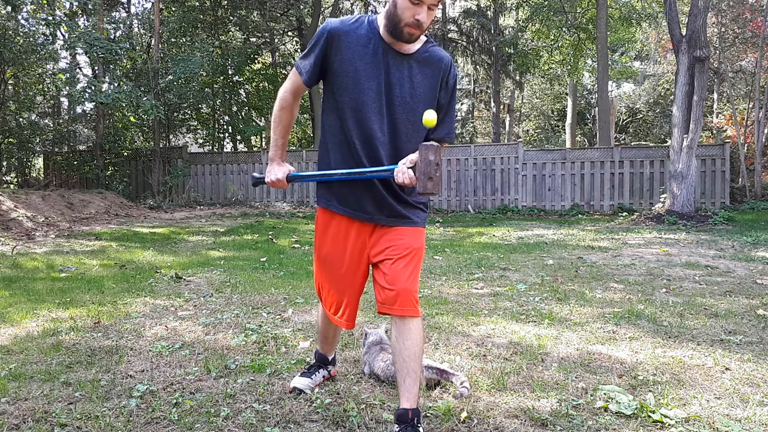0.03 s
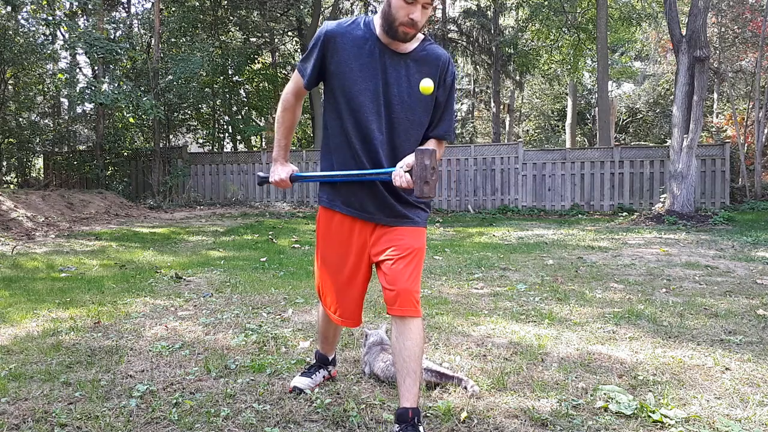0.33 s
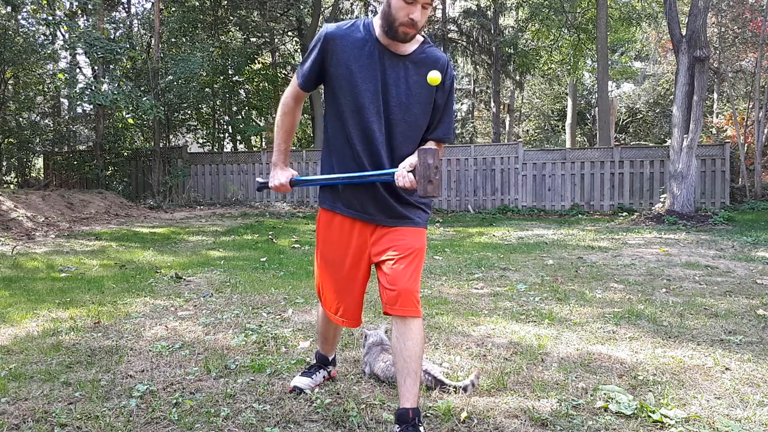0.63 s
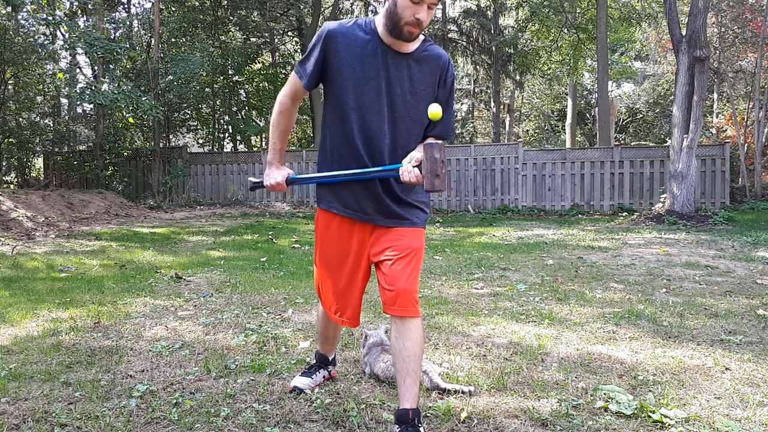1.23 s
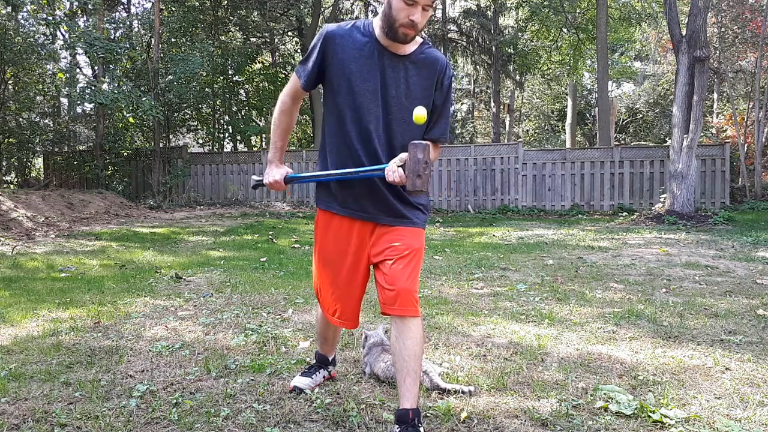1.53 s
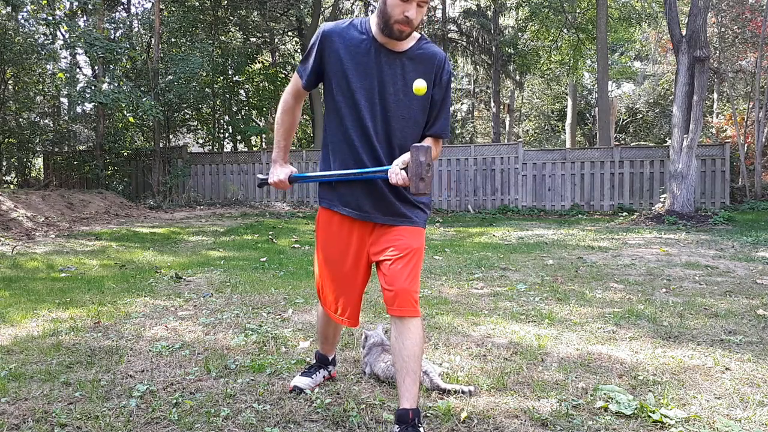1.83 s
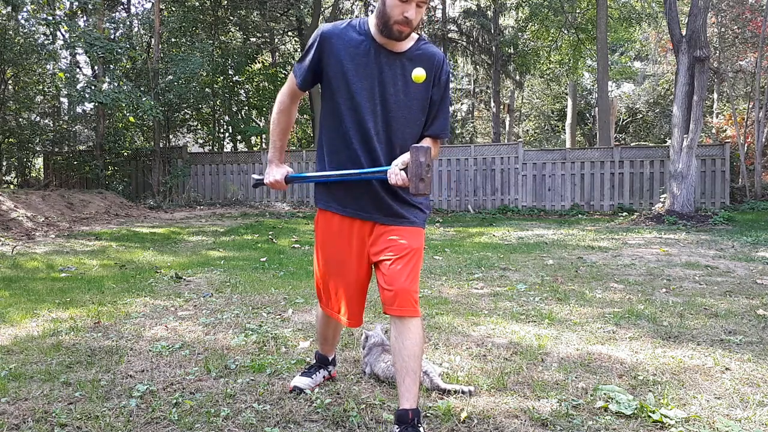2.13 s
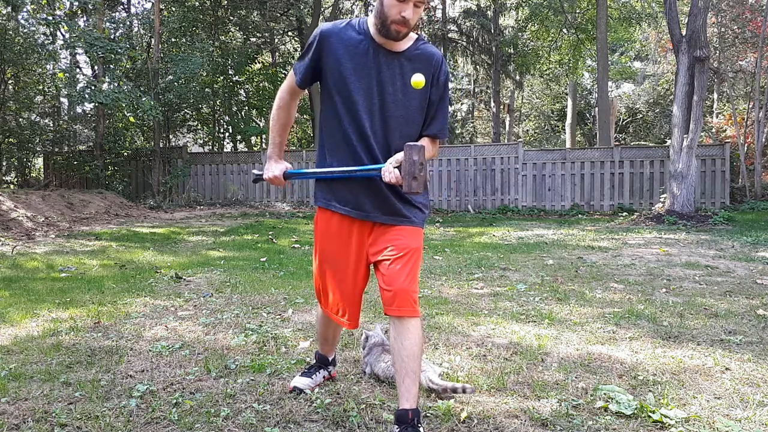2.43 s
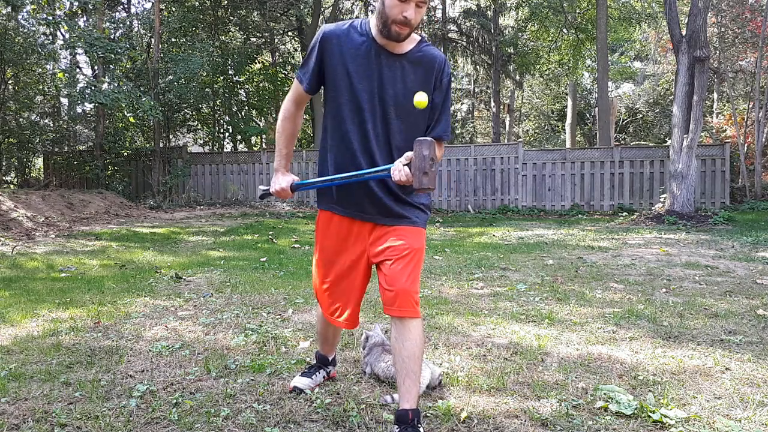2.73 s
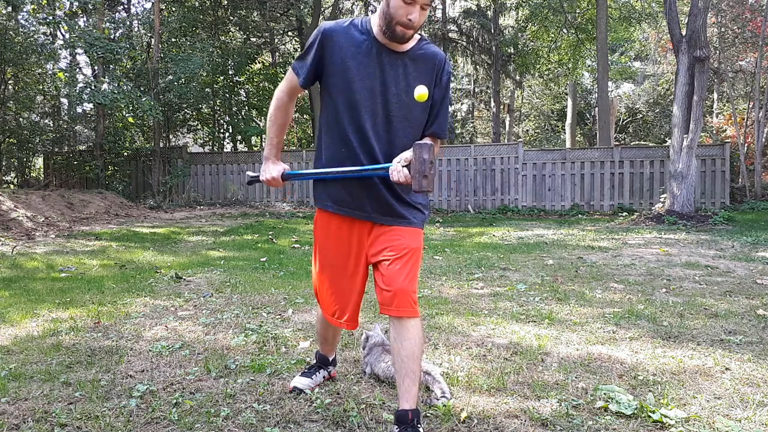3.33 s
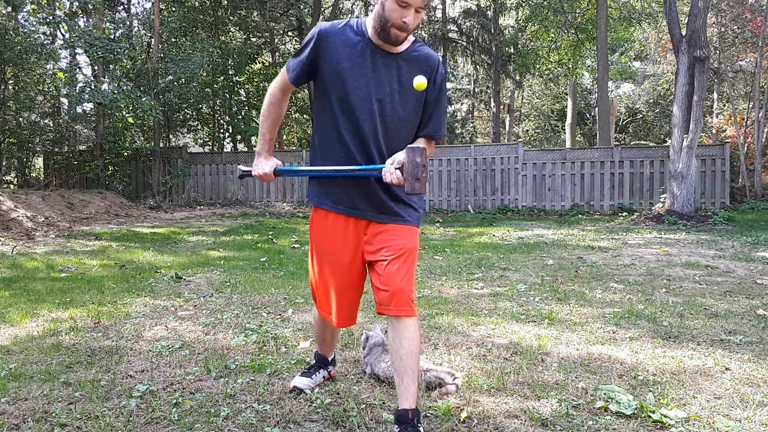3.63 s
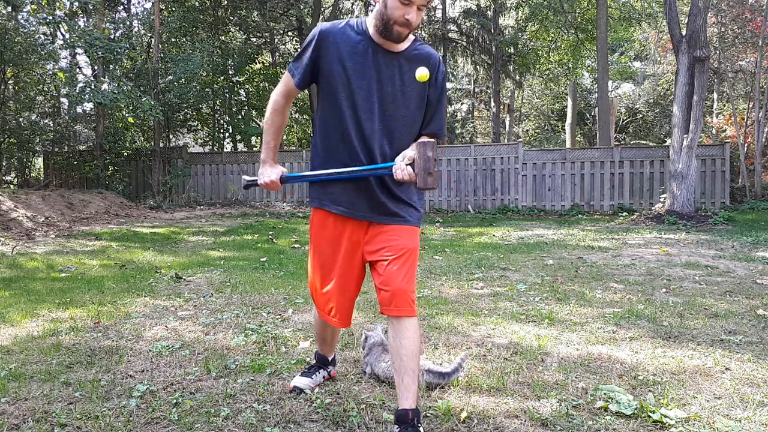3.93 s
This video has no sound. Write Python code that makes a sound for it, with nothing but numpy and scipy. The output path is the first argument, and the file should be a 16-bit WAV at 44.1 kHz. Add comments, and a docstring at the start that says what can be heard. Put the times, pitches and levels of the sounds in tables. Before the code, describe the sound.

Sharp, even taps of a ball bouncing on a sledgehammer, over faint crickets and distant traffic.

```python
"""A backyard, where a small ball is kept bouncing on the steel head of a sledgehammer.
Each tap is a hollow knock with a very short metallic ring, mirrored by the ground and scattered by
fence and trees. Crickets chirp and a katydid ticks and buzzes with its wings. Two faint bird notes
come through the trees, and engines drone far away over the hush of traffic and leaves."""
import sys
import numpy as np
from scipy import signal
from scipy.io import wavfile

SR = 44100
rng = np.random.default_rng(int(sys.argv[2]) if len(sys.argv) > 2 else 0)


def transcribe(signal):
    """Save signal, clipped to [-1, 1], as a 16-bit WAV file at the path in sys.argv[1]."""
    frames = np.atleast_2d(signal).T
    limited = np.clip(frames, -1, 1)
    pcm = np.round(limited * 32767).astype(np.int16)
    wavfile.write(sys.argv[1], SR, pcm)


N = 176400
T = np.arange(N) / SR


def from_db(db):
    """Decibels to gain."""
    return 10 ** (np.asarray(db) / 20)


def rms_one(x):
    """Scale to rms 1."""
    return x / np.sqrt(np.mean(x ** 2) + 1e-20)


def automation(rows):
    """Breakpoint curves, read at every sample."""
    time_s, *columns = np.transpose(rows)
    return [np.interp(T, time_s, column) for column in columns]


def at_hz(points, hz):
    """Read a curve on a log-frequency axis."""
    freq_hz, value = np.transpose(points)
    return np.interp(np.log(hz), np.log(freq_hz), value)


def pan(db):
    """Left and right gains; positive is to the right."""
    return from_db(np.array([[-db], [db]]))


def butter(x, hz, kind, order=2):
    """Butterworth low-, high- or band-pass."""
    sos = signal.butter(order, np.clip(hz, 10, .48 * SR), kind, fs=SR, output="sos")
    return signal.sosfilt(sos, x + 1e-18)


def drift(hz):
    """Random modulation slower than hz, at rms 1."""
    return rms_one(butter(rng.standard_normal(N + SR), hz, "low")[SR:])


def clicks(times_s, db):
    """One click at each time."""
    out = np.zeros(N)
    out[np.clip(np.round(times_s * SR).astype(int), 0, N - 1)] = from_db(db)
    return out


def ring(x, hz, t60_s):
    """A resonator: a unit click sets a sine of height 1 ringing."""
    r, w = np.exp(-np.log(1000) / (t60_s * SR)), 2 * np.pi * hz / SR
    return signal.lfilter([0, np.sin(w)], [1, -2 * r * np.cos(w), r * r], x + 1e-18)


def yard(x, t60_s=0.28, build_s=0.0064):
    """Reverb of fence and trees: dense faint echoes, different at each ear."""
    t = T[:SR // 2]
    onset = 1 - np.exp(-(t / build_s) ** 2)
    echoes = rng.standard_normal((2, len(t))) * np.exp(-np.log(1000) * t / t60_s) * onset
    return signal.fftconvolve(x[None], rms_one(echoes) / np.sqrt(len(t)), axes=1)[:, :N]


# Stereo image of the noise, centred lows and wide highs: freq_hz, left_right_correlation
STEREO_IMAGE = [(60, 1), (150, 0.92), (280, 0.83), (550, 0.75), (1000, -0.24), (2000, -0.13),
                (4000, -0.048), (12000, -0.07)]


def noise_bands(spectrum, low_hz, high_hz, count):
    """Centres and bands of shaped stereo noise; the bands add up to rms 1."""
    edges = np.geomspace(low_hz, high_hz, count + 1)
    centres = np.sqrt(edges[1:] * edges[:-1])
    white, bands = rng.standard_normal((2, 2, N)), []
    for k, hz in enumerate(centres):
        mid, side = butter(white[k % 2], edges[k:k + 2], "band", order=3)
        alike = np.clip(at_hz(STEREO_IMAGE, hz), -1, 1)
        stereo = np.sqrt(1 + alike) * mid + np.sqrt(1 - alike) * side * [[1], [-1]]
        bands.append(from_db(at_hz(spectrum, hz)) * stereo)
    return centres, np.array(bands) / np.std(sum(bands))


# Tone of the bed of traffic and leaves: freq_hz, relative_density_db
HUSH_SPECTRUM = [(25, -49), (40, -15.5), (60, -8), (105, 3.5), (170, -3), (260, -12.5), (420, -21.5),
                 (620, -22), (950, -11), (1300, -18.5), (2000, -28), (3500, -33.5), (6000, -38.5),
                 (10000, -42), (16000, -38)]
# Fader ride on the rumble: time_s, gain_db
RUMBLE_RIDE = [(0, -56.5), (.9, -56.5), (1.8, -52), (3.1, -51), (4, -54.5)]
TRAFFIC_PAN_DB = 1.05


def hush(crossover_hz=450, wash_gain_db=-55.5):
    """Traffic rumble that swells slowly, under a steady wash of tyres and leaves."""
    centres, bands = noise_bands(HUSH_SPECTRUM, 22, 17500, count=26)
    rumble_db, = automation(RUMBLE_RIDE)
    low = centres < crossover_hz
    rumble = pan(TRAFFIC_PAN_DB) * from_db(rumble_db) * bands[low].sum(0)
    return rumble + from_db(wash_gain_db) * bands[~low].sum(0)


# Two far engines, one revving up and easing off, one steadier: time_s, firing_hz, level_db
REVVING_ENGINE = [(0, 80, -60), (.5, 90, -55.5), (.88, 90, -49), (1.05, 102, -55), (1.3, 113, -51),
                  (1.6, 128, -53), (2.0, 133, -49.5), (2.4, 135, -61.5), (2.6, 150, -58.5), (3.1, 150, -58),
                  (3.4, 130, -68.5), (4, 127, -66)]
CRUISING_ENGINE = [(0, 94.8, -76), (1.2, 91.35, -58.5), (1.85, 101.9, -59), (2.15, 112, -50),
                   (2.42, 103.1, -48), (2.75, 106.4, -54.5), (3.3, 110, -54), (4, 110, -54)]


def engine(curve, flutter=0.28, octave_db=-18.5):
    """Only the firing note and its octave carry this far, fluttering on the way."""
    hz, db = automation(curve)
    phase = 2 * np.pi * np.cumsum(hz) / SR
    note, octave = [np.sin(k * phase) * (1 + flutter * drift(13.3))
                    + np.cos(k * phase) * flutter * drift(9.6) for k in (1, 2)]
    return pan(TRAFFIC_PAN_DB) * from_db(db) * rms_one(note + from_db(octave_db) * octave)


# Faint far bird notes: start_s, length_s, start_hz, end_hz, level_db
BIRD_NOTES = [(0.807, 0.114, 4550, 4390, -67), (1.04, .19, 2080, 2350, -74)]


def birds(wobble_hz=127):
    """Thin gliding notes, all reverb: they arrive only through the trees."""
    song = 0
    for start_s, length_s, start_hz, end_hz, db in BIRD_NOTES:
        along = np.clip((T - start_s) / length_s, 0, 1)
        hz = start_hz + (end_hz - start_hz) * along + wobble_hz * drift(150)
        song = song + from_db(db) * np.sin(np.pi * along) * np.sin(2 * np.pi * np.cumsum(hz) / SR)
    return np.sqrt(2) * yard(song)


# The katydid's long buzzes: start_s, release_s
KATYDID_BUZZES = [(-.4, .222), (1.17, 1.822), (3.12, 3.835)]
# Its single wing scrapes: start_s, relative_level_db
KATYDID_SCRAPES = [(0.997, -6), (1.052, -3), (1.106, -0.5), (1.160, -5), (2.887, -7), (2.948, -2.5),
                   (3.009, 0.5), (3.067, 2)]
# Its sizzling tone: freq_hz, relative_density_db
KATYDID_SPECTRUM = [(8500, -57), (9700, -14.5), (10600, -4.5), (12000, 1), (13600, 3), (15000, -2),
                    (16000, -19), (18000, -26)]


def katydid(level_db=-59.5, wing_hz=62.2, throb_depth=0.2):
    """A few separate wing scrapes, then a long buzz that throbs at the wing rate."""
    swell_s, release_s = 0.091, 0.04
    scrape_attack_s, scrape_decay_s = 0.009, 0.031
    envelope = np.zeros(N)
    for on_s, off_s in KATYDID_BUZZES:
        swell = 1 - np.exp(-np.maximum(T - on_s, 0) / swell_s)
        envelope += swell * np.exp(-np.maximum(T - off_s, 0) / release_s)
    envelope *= 1 + throb_depth * np.sin(2 * np.pi * wing_hz * T)
    for start_s, db in KATYDID_SCRAPES:
        age = np.maximum(T - start_s, 0)
        attack = 1 - np.exp(-(2 * age / scrape_attack_s) ** 2)
        envelope += from_db(db) * attack * np.exp(-age / scrape_decay_s)
    _, bands = noise_bands(KATYDID_SPECTRUM, 8500, 17500, count=10)
    return from_db(level_db) * envelope * bands.sum(0)


# Pulse of each cricket: first_chirp_s, interval_s, shortening_per_chirp_s
CRICKET_RHYTHMS = [(.0035, .05661, .0000184), (.028, .05772, .0000088), (.030, .0615, 0)]
# Voice of each cricket: top_pitch_hz, arch_depth_hz, length_s, level_db, pan_db, reverb_send_db
CRICKET_VOICES = [(7780, 800, 0.016, -59, 1, -7.5), (8465, 500, .023, -65, 7.5, -1),
                  (8300, 500, 0.016, -66.5, -1, -1)]


def cricket(first_s, interval_s, shortening_s, top_hz, arch_hz, length_s, db, pan_db, send_db):
    """Each wing stroke is a short whistle whose pitch arches up and down."""
    wobble_hz, wander_hz, roughness, waver_db, left_lag_s = 91, 43.7, 0.23, 0.53, 0.00003
    k = np.arange(int(N / SR / interval_s) + 3)
    middles_s = first_s + k * interval_s - shortening_s * k ** 2 / 2
    nearest = np.round(np.interp(T, middles_s, k)).astype(int)
    stroke = np.clip((T - middles_s[nearest]) / (length_s / 2), -1, 1)   # -1 to 1 across each chirp
    hz = top_hz - arch_hz * stroke ** 2 + wobble_hz * drift(499.73) + wander_hz * drift(10)
    envelope = np.cos(np.pi / 2 * stroke ** 2) * (1 + roughness * drift(330))
    envelope *= from_db(db + waver_db * drift(8))
    phase = 2 * np.pi * np.cumsum(hz) / SR
    song = envelope * np.sin([phase - 2 * np.pi * hz * left_lag_s, phase]) * np.sqrt(2)
    return pan(pan_db) * song + from_db(send_db) * pan(pan_db / 2) * yard(song[1], t60_s=0.14)


def contact_tick(times_s, db, t60_s=0.011):
    """The bright edge of each landing: a fast-dying burst of high noise."""
    decay = np.exp(-np.log(1000) / (t60_s * SR))
    envelope = signal.lfilter([1], [1, -decay], clicks(times_s, db) + 1e-18)
    return butter(envelope * rng.standard_normal(N), 3450, "high")


# Each landing, with a trim for each layer of the tap:
# start_s, knock_db, hollow_db, ring_db, clack_db, upper_db, tick_db
LANDINGS = [(0.121, 1.5, -0.2, -1.7, -0.5, 2, 1), (0.5, -0.3, 2, 2.5, 1, -3, -3.5),
            (0.8692, -0.8, 3.5, -0.5, -2, -0.5, -5), (1.2534, 1.5, -3, 2.5, 5, -4.2, -0.8),
            (1.6226, 0, 3, -1.5, 0.5, 0, 4.9), (1.9923, 0.8, 2, -0.5, 0.5, -1, -2.5),
            (2.3623, 2, -1, -0.5, 7, 6.5, -1), (2.7285, 0.7, 6, -4.0, 4.5, 6.5, 1),
            (3.1044, 1, 3, 4, 4, -5, 0.5), (3.47, 1, 1, -0.7, 0, -9, 0.5), (3.8275, 0.5, 1.5, 3, 3, 4, 6.5)]
# Modes of ball and hammer head, layer by layer: pitch_hz, level_db, t60_s
KNOCK_MODES = [(350, -39.5, 0.01), (1245, -32, 0.0063), (1620, -39.5, 0.0051), (2420, -54, 0.013)]
HOLLOW_MODES = [(946, -36.5, 0.0071)]
RING_MODES = [(3434, -40, 0.02)]
CLACK_MODES = [(3800, -42.5, 0.0055)]
UPPER_MODES = [(5080, -46.5, 0.011), (6520, -56.5, 0.021), (7600, -44, 0.0031), (9000, -59, 0.0023)]   # their strength depends on where the ball lands


def ball(scatter_db=0.5, ground_delay_s=0.002338, ground_db=-1.5, pan_db=1.5, send_db=-8):
    """Each landing rings ball and hammer head; the lawn returns a dull copy, the yard a soft tail."""
    times_s, knock_db, hollow_db, ring_db, clack_db, upper_db, tick_db = np.transpose(LANDINGS)
    layers = [(KNOCK_MODES, knock_db, 1), (HOLLOW_MODES, hollow_db, 1), (RING_MODES, ring_db, 1),
              (CLACK_MODES, clack_db, -1), (UPPER_MODES, upper_db, 1)]
    body = 0
    for modes, trim_db, polarity in layers:
        for k, (hz, db, t60_s) in enumerate(modes):
            blows = clicks(times_s, trim_db + db + scatter_db * rng.standard_normal(len(times_s)))
            body = body + polarity * (-1) ** k * ring(blows, hz, t60_s)
    direct = butter(body, 164, "high") + contact_tick(times_s, tick_db - 43)
    ground = np.interp(T - ground_delay_s, T, butter(direct, 2300, "low", order=1))
    tap = direct + from_db(ground_db) * ground
    crack = butter(clicks(times_s, knock_db - 25), (420, 5100), "band")
    leaf_splash = yard(crack, t60_s=0.49)
    tail = yard(butter(tap, 2000, "low"))
    return pan(pan_db) * tap + from_db(send_db) * tail + leaf_splash


def scene():
    """Traffic far back, birds and insects around, the ball up front."""
    crickets = sum(cricket(*rhythm, *voice) for rhythm, voice in zip(CRICKET_RHYTHMS, CRICKET_VOICES))
    traffic = hush() + engine(REVVING_ENGINE) + engine(CRUISING_ENGINE)
    return traffic + katydid() + crickets + birds() + ball()


def record(dry, cutoff_hz=16000):
    """A steep low-pass on the whole mix."""
    return signal.sosfilt(signal.ellip(10, .2, 70, cutoff_hz, fs=SR, output="sos"), dry)


dry = scene()
out = record(dry)
transcribe(out)
```